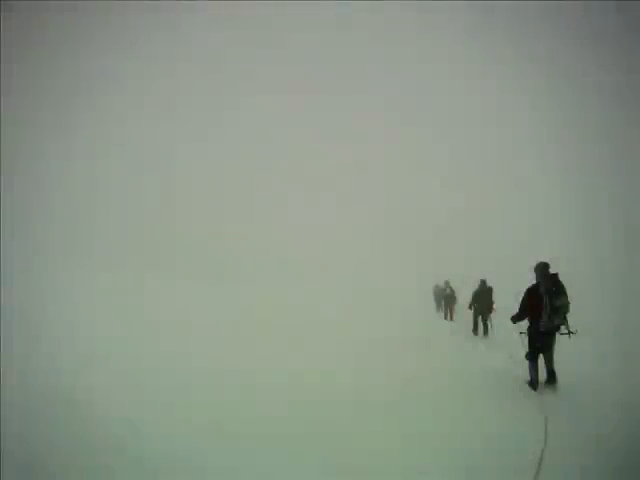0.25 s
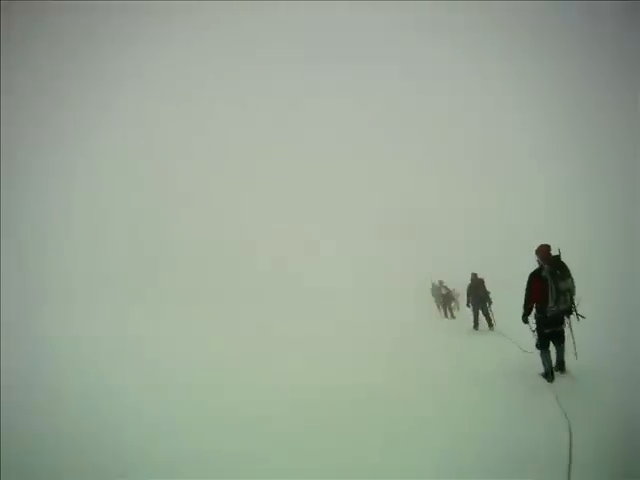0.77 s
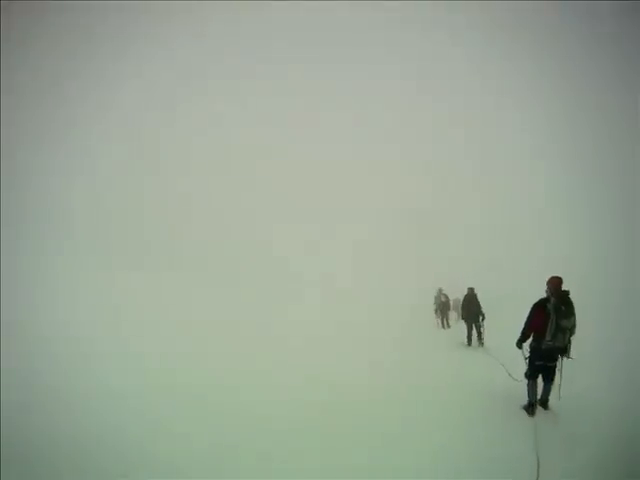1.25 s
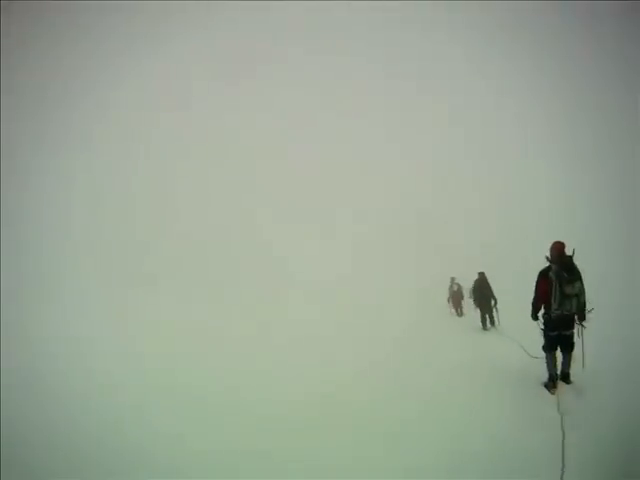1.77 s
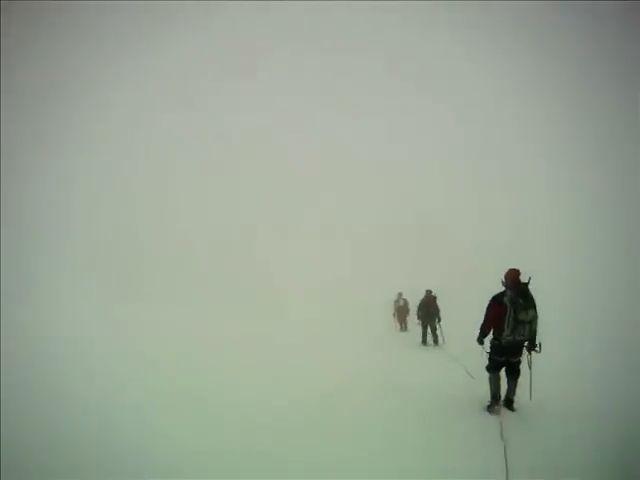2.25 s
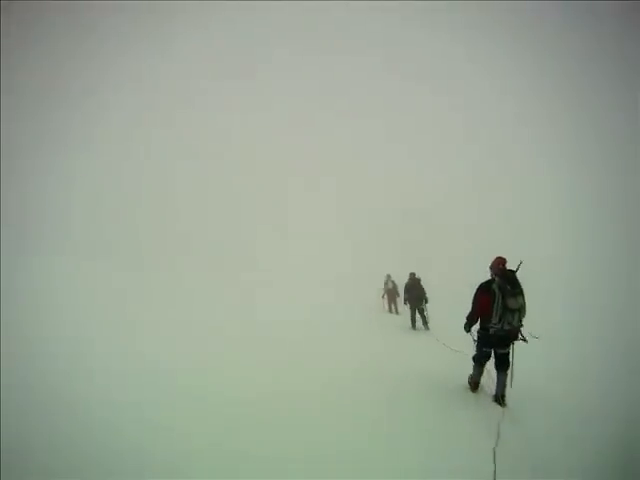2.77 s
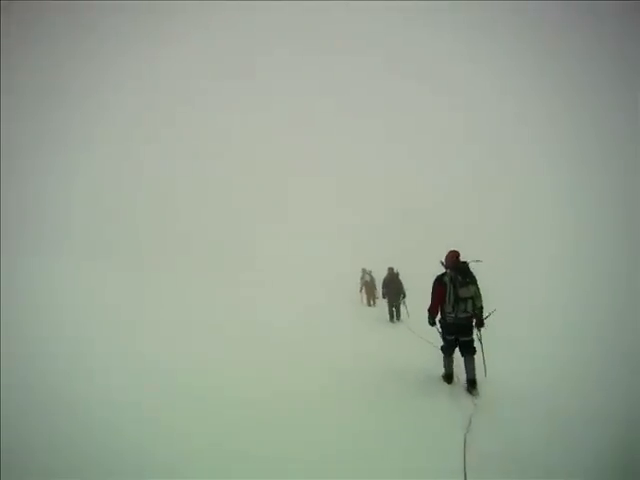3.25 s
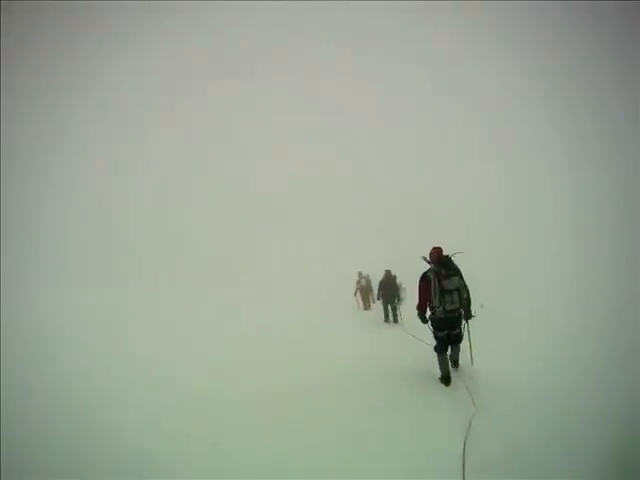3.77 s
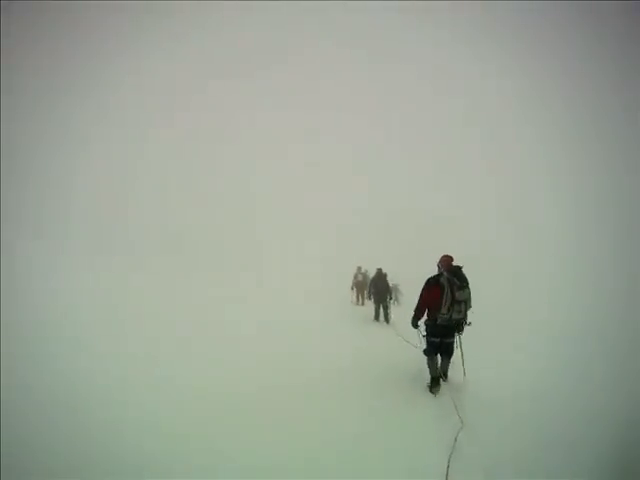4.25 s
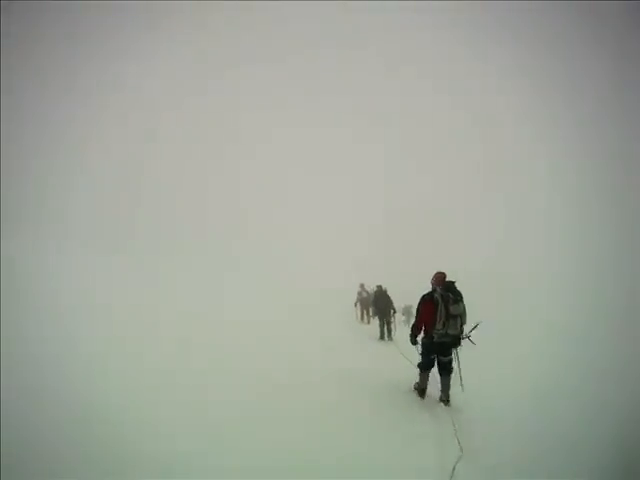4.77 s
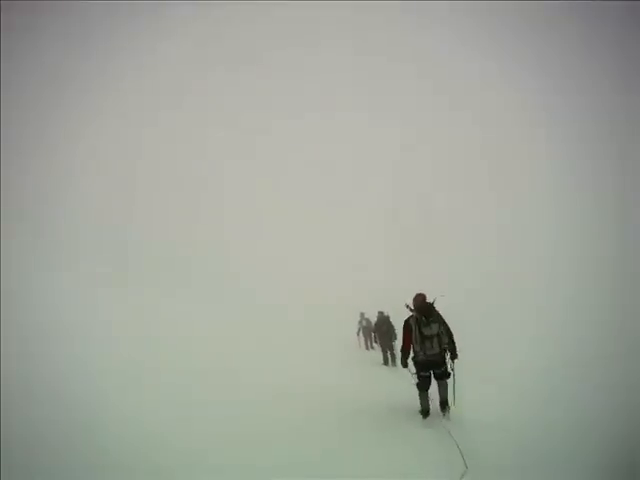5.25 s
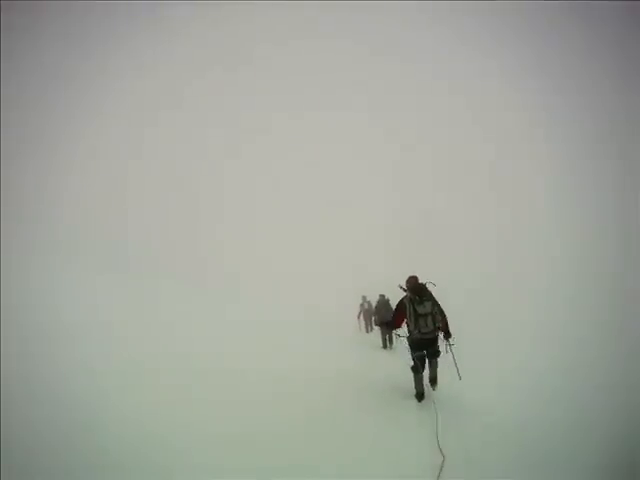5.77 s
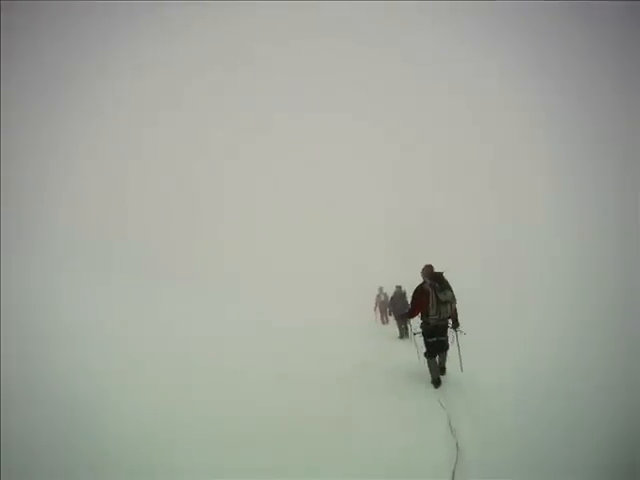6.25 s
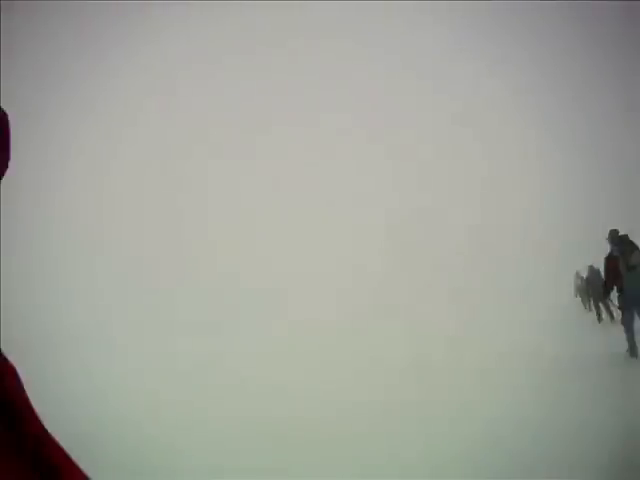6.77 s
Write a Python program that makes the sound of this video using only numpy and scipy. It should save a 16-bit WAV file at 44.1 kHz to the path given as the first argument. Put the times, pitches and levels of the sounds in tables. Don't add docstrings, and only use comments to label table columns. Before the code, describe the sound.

Nearly half a second of silence, then strong wind cuts in abruptly at full force. It blows straight onto a small camera microphone on an open foggy snowfield: heavy rumble, dense roar and thin grainy hiss. Short dull thumps strike several times a second, each making the roar dip briefly before it surges back. No footsteps or voices are heard, no echo.

```python
import sys
import numpy as np
from scipy import signal
from scipy.fft import rfft, irfft
from scipy.io import wavfile
from scipy.ndimage import uniform_filter1d

SR = 44100
rng = np.random.default_rng(int(sys.argv[2]) if len(sys.argv) > 2 else 0)


def gain_from_decibels(decibels):
    exponent = np.asarray(decibels, float) / 20
    return 10 ** exponent


def digitize_waveform(pressure):
    field = np.atleast_2d(pressure).T
    bounded = np.clip(field, -1, 1)
    quanta = np.round(bounded * 32767).astype(np.int16)
    wavfile.write(sys.argv[1], SR, quanta)


N = 308964

LAYER_PITCHES = [
    90,
    400,
    1400,
    3600,
]
# start_s, peak_pressure (-1 to 1), width_ms, gain_change_db (only falls act)
LARGE_EDDIES = [(0.6, 0.89, 2.2, -6), (0.832, 0.38, 2.3, -4), (0.985, -0.58, 1.83, 0),
                (1.137, -0.53, 3, -1.5), (1.368, -0.51, 1, 0), (1.43, -0.39, 1.1, -2),
                (1.541, -0.33, 1.8, 0), (1.681, -0.78, 1.6, -1), (1.835, -0.59, 1.7, -3),
                (1.96, -0.63, 3.15, -5.5), (2.121, 0.64, 2.4, -4.5), (2.294, -0.62, 3, -0.5),
                (2.451, -0.81, 1.6, -1.5), (2.686, 0.49, 3.3, -5), (2.775, -0.68, 2.2, 0),
                (2.85, -0.56, 2.6, -3.5), (2.959, 0.39, 2, 0), (3.347, 0.56, 2.7, 0),
                (3.429, 0.56, 2.2, -2.5), (3.733, 0.55, 2.6, 0), (3.882, 0.6, 2.1, -2.5),
                (4.436, 0.8, 2.7, -3), (4.706, 0.5, 2.1, -2), (5.198, 0.49, 2.4, 0),
                (5.42, -0.57, 2.4, -4.5), (5.508, -0.37, 5.9, -3), (5.816, 0.61, 2.1, 12),
                (6.048, 0.51, 4.2, -0.5), (6.372, -0.82, 2, -5.5), (6.816, -0.56, 3, -4.5)]


def turbulence(lump_db, shared_db, own_db):
    # pitch_hz, level_db (per Hz)
    wind_colour = [(12, -18), (45, 1), (130, -0.5), (250, -6), (480, -9.5), (800, -19.5), (2000, -29.5),
                   (2800, -33.5), (3100, -37.5), (3750, -38), (4250, -46), (5500, -50), (5800, -62.5),
                   (6000, -62)]
    swing_db = gusts()
    lumps = drift(9.8)
    flutter = drift(49.0)
    white = rng.standard_normal((2, N))
    out = np.zeros(N)
    edges_hz = np.geomspace(10, 9000, 30)
    for k, (low, high) in enumerate(zip(edges_hz, edges_hz[1:])):
        band_filter = signal.butter(2, [low, high], "band", fs=SR, output="sos")
        band = signal.sosfilt(band_filter, white[k % 2])
        place = np.interp(np.log(low * high) / 2, np.log(LAYER_PITCHES), np.arange(4))
        below = min(int(place), 2)
        gust_db = swing_db[below] + (place - below) * (swing_db[below + 1] - swing_db[below])
        chance_db = lump_db * lumps + shared_db * flutter + own_db * drift(13.6)
        swing_share = np.interp(low, (3600, 4600), [1, 0.6])
        out += band * gain_from_decibels((gust_db + chance_db) * swing_share)
    hz, per_hz_db = np.transpose(wind_colour)
    colour_db = np.interp(np.log(np.fft.rfftfreq(N, 1 / SR) + 1), np.log(hz), per_hz_db)
    out = irfft(rfft(out) * gain_from_decibels(colour_db), N)
    return out / out.std()


def gusts():
    # time_s, level_db
    wind_speed = [(0.44, -2.1), (0.64, -2.4), (0.92, 0.9), (1.52, -4), (1.84, 0.3), (2.16, -6.5),
                  (2.28, -1.5), (2.8, -1.6), (2.96, -9), (3.6, 8.5), (4.0, -0.7), (4.24, 9.5), (4.36, 0.4),
                  (6.2, 3.5), (6.64, -5.5), (6.76, 3), (6.88, 3.5), (6.99, -6)]
    speed_share = [
        -0.12,
        0.54,
        0.56,
        1.0,
    ]
    # time_s, length_ms, rise_db, pitch_hz (of the eddies they stir)
    puffs = [(0.45, 66, 2.5, 500), (0.5, 110, 2.5, 292), (0.6, 25, 8.5, 170.0), (0.75, 41, 3.6, 830.0),
             (0.92, 89, 3.5, 4000.0), (1.35, 250, 3, 290.0), (1.43, 27, 3, 490.0), (1.64, 68, 5.5, 830.0),
             (1.81, 55, 4.5, 1400.0), (1.96, 17, 5, 2370.0), (2.24, 91, 3.5, 4000.0), (2.44, 23, 6, 490.0),
             (2.76, 39, 6.5, 1400.0), (3.25, 290, 2.7, 4000.0), (3.61, 110, 3, 4000.0), (3.86, 56, 7, 2340),
             (3.89, 76, 5.5, 100.0), (4.05, 50, 3, 2370.0), (4.43, 30, 7.5, 1400.0), (4.63, 140, 3, 4000.0),
             (4.78, 30, 5.5, 1400.0), (5.07, 170, 0.5, 490.0), (5.36, 210, 3.5, 290.0),
             (5.93, 58, 5, 490.0), (6.36, 41, 1.5, 4000.0), (6.38, 21, 7.5, 100.0), (6.5, 20, 2.5, 1400.0),
             (6.65, 27, 10, 2370.0), (6.78, 140, 5.5, 1200), (6.82, 300, 1.6, 830.0)]
    # time_s, length_ms, fall_db, pitch_hz (of the eddies they calm)
    lulls = [(1.1, 290, -0.5, 5000), (1.18, 67, -1, 4000.0), (1.35, 50, -1, 4000.0),
             (1.48, 30, -4.8, 4000.0), (1.75, 82, -5.8, 290.0), (1.89, 47, -7.5, 490.0),
             (2.05, 50, -7.5, 290.0), (2.09, 33, -6.5, 4000.0), (2.33, 69, -1, 4000),
             (2.36, 85, -7.5, 290.0), (2.66, 37, -3.5, 4000.0), (2.7, 40, -3.5, 1400),
             (3.05, 100, -5, 830.0), (3.15, 80, -1, 300), (3.46, 154, -5.5, 493), (3.77, 66, -5.5, 490.0),
             (3.95, 56, -2.9, 1400.0), (4.01, 170, -5, 170.0), (4.25, 44, -4, 5000), (4.48, 50, -6, 4000.0),
             (4.51, 85, -8, 490.0), (4.73, 27, -6, 830.0), (4.85, 150, -1.5, 400), (4.98, 68, -7, 2370.0),
             (5.64, 370, -3.5, 1400.0), (6.1, 65, -6, 2370.0), (6.42, 59, -5, 490.0),
             (6.57, 100, -4, 4000.0), (6.78, 130, -4, 5000), (6.85, 25, -5.0, 4000.0)]
    reach_octaves = 2.9
    t = np.arange(0, N, 64) / SR
    swing_db = np.outer(speed_share, np.interp(t, *np.transpose(wind_speed)))
    for s, length_ms, db, hz in puffs + lulls:
        octaves_away = np.log2(np.divide(LAYER_PITCHES, hz))
        reach = np.exp(-np.log(16) * (octaves_away / reach_octaves) ** 2)
        swing_db += db * np.outer(reach, hump(t - s, length_ms))
    for s, pressure, width_ms, duck_db in LARGE_EDDIES:
        swing_db[0] += 1.5 * abs(pressure) * hump(t - s, 42)
    swing_db -= swing_db.mean(axis=1, keepdims=True)
    return np.array([np.interp(np.arange(N) / SR, t, layer) for layer in swing_db])


def buffets(size, lead, trail, calm):
    out = np.zeros(N)
    room = np.ones(N)
    t = np.arange(-900, 900) / SR
    for s, pressure, width_ms, duck_db in LARGE_EDDIES:
        before, after = (0.62, 0.28) if pressure > 0 else (0.25, 0.43)
        middle = round(s * SR)
        near = slice(middle - 900, middle + 900)
        swing_before = before * hump(t + lead * width_ms / 1000, 1.1 * width_ms)
        swing_after = after * hump(t - trail * width_ms / 1000, 1.76 * width_ms)
        out[near] += size * pressure * (hump(t, width_ms) - (swing_before + swing_after))
        room[near] *= 1 - calm * hump(t, 5.9 * width_ms)
    vent = signal.butter(1, 12, "high", fs=SR, output="sos")
    return signal.sosfilt(vent, out), room


def hump(t, width_ms):
    return np.exp(-np.log(16) * (t * 1000 / width_ms) ** 2)


def drift(rate):
    r = np.exp(-40 * np.pi * rate / SR)
    noise = rng.standard_normal(N // 20 + 2002)
    slow = signal.lfilter([1], [1, -2 * r, r * r], noise)[2000:]
    return np.interp(np.arange(N) / 20, np.arange(len(slow)), slow / slow.std())


def ducking(demand_db, release_db_per_s, attack_s):
    ramp = release_db_per_s * np.arange(N) / SR
    held = np.maximum(np.maximum.accumulate(demand_db + ramp) - ramp, 0)
    r = np.exp(-1 / (attack_s * SR))
    return -signal.lfilter([1 - r], [1, -r], held)


def scene():
    demand_db = np.zeros(N)
    for s, pressure, width_ms, duck_db in LARGE_EDDIES:
        demand_db[round((s + 0.003) * SR)] = -duck_db
    duck = gain_from_decibels(ducking(demand_db, 46.0, 0.003))
    wind = gain_from_decibels(-15.5) * turbulence(lump_db=0.5, shared_db=1.5, own_db=1.5) * duck
    low_part = signal.sosfiltfilt(signal.butter(2, 300, fs=SR, output="sos"), wind)
    thumps, room = buffets(size=1.15, lead=1.6, trail=1.7, calm=0.75)
    return (wind - low_part * (1 - room) + thumps)[None]


def thin_treble(x, follow, unsteady_db):
    # pitch_hz, level_db
    faint_limit = [(4600, -24), (5200, -13), (5700, -9), (6300, -4), (6700, -7), (7700, -9), (8200, -14),
                   (9500, -22)]
    # time_s, rise_db
    limit_rise = [(0, 4), (2.2, 4), (3.2, 1.5), (3.6, -3), (4.2, 0), (6.4, 0), (6.7, 4), (7, 3)]
    hz, s, lines = signal.stft(x, SR, nperseg=2048, noverlap=1024)
    power = np.abs(lines) ** 2 + 1e-20
    hiss_db = 10 * np.log10(power[(hz > 4000) & (hz < 8000)].mean(axis=0))
    hiss_db = hiss_db.mean() + follow * (hiss_db - hiss_db.mean())
    group = np.arange(len(hz)) // 7 * 7
    level_db = 10 * np.log10(uniform_filter1d(power, size=7, axis=0))[group]
    luck = uniform_filter1d(rng.standard_normal(lines.shape), size=2, axis=1)[group]
    floor_db = np.interp(hz, *np.transpose(faint_limit), left=-200, right=-200)[:, None]
    floor_db = floor_db + hiss_db + np.interp(s, *np.transpose(limit_rise)) + unsteady_db * luck
    kept = (hz < 10850) & ((hz < 5830) | (hz > 6260))
    lines = lines * kept[:, None] * (level_db > floor_db)
    return signal.istft(lines, SR, nperseg=2048, noverlap=1024)[1][:N]


def band_limit(x):
    return signal.sosfilt(signal.butter(12, 11520, fs=SR, output="sos"), x)


def record(dry):
    sampling_hz, start_s = 12000, 0.4214
    over_db = 20 * np.log10(np.abs(dry[0]) + 1e-9) + 5.0
    x = dry[0] * gain_from_decibels(0.5 * ducking(over_db, 40.0, 0.004))
    x = 1.3 * np.tanh(x / 1.3)
    hz = np.fft.rfftfreq(N, 1 / SR)
    t = np.arange(N) / SR
    x = irfft(rfft(x) * (hz < sampling_hz / 2), N)
    x = x * (1 + 2 * gain_from_decibels(1.07) * np.cos(2 * np.pi * sampling_hz * t))
    x = irfft(rfft(x) * np.sinc(hz / sampling_hz), N)
    x = thin_treble(x, follow=0.85, unsteady_db=6.0)
    x = x * np.clip((t - start_s) / 0.0003, 0, 1)
    return band_limit(x[None])


dry = scene()
out = record(dry)
digitize_waveform(out)
```